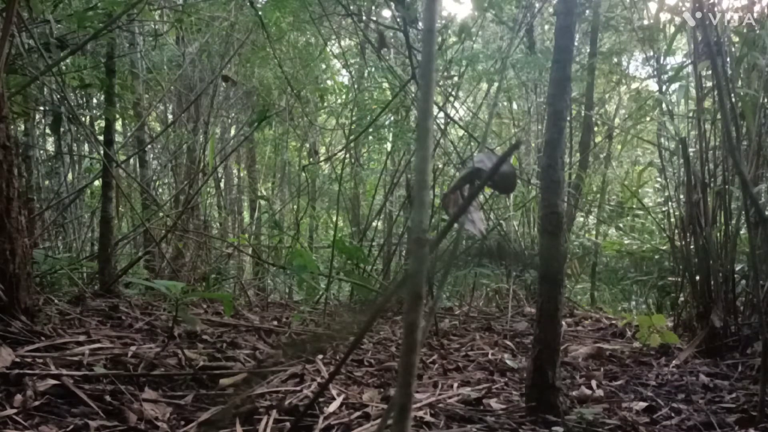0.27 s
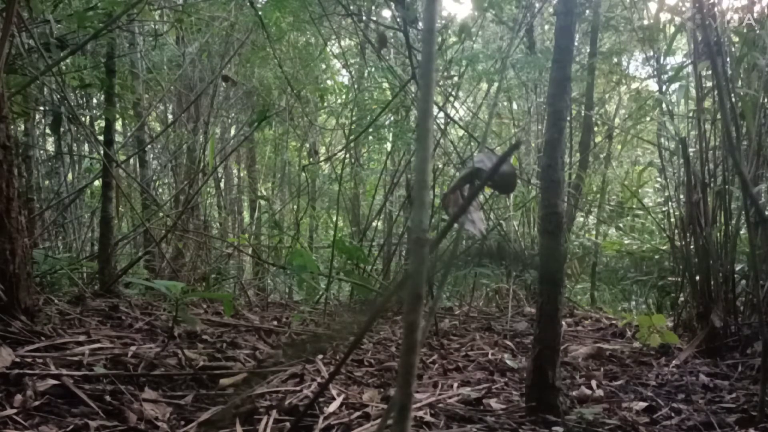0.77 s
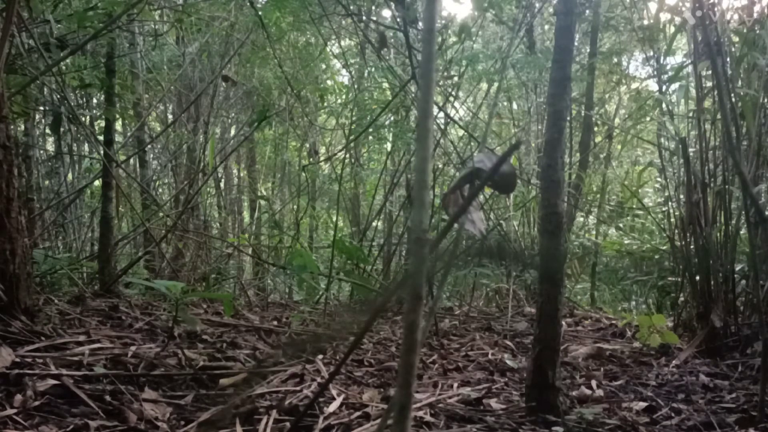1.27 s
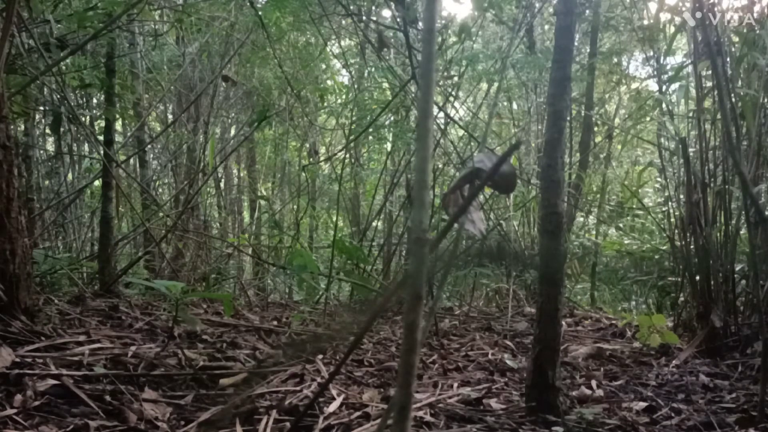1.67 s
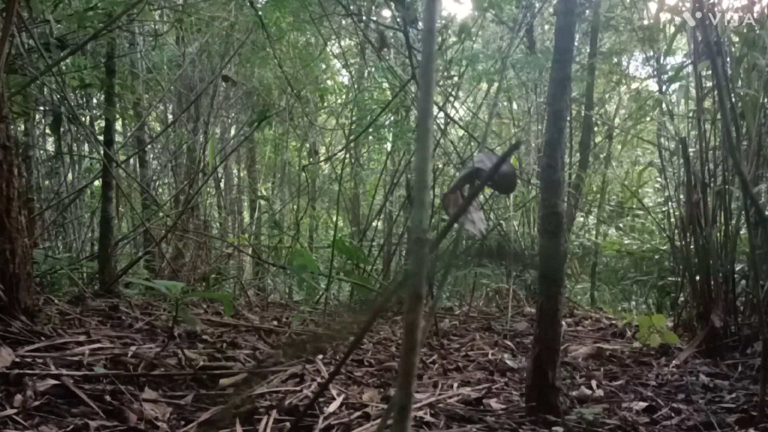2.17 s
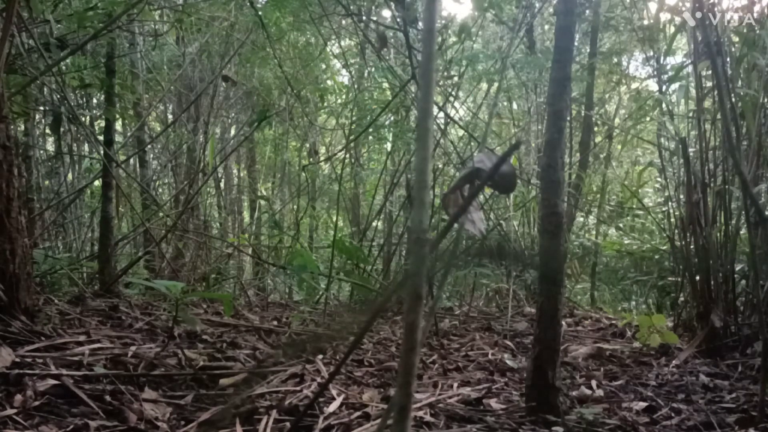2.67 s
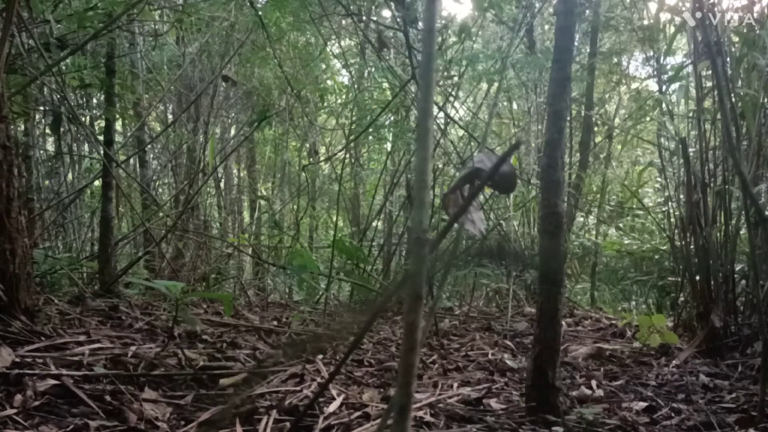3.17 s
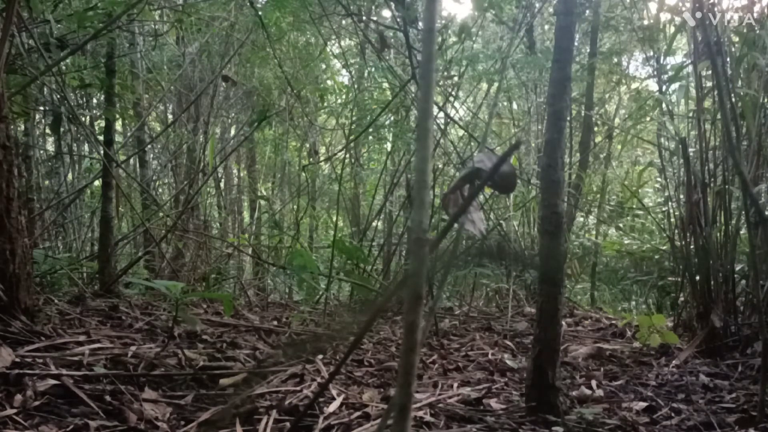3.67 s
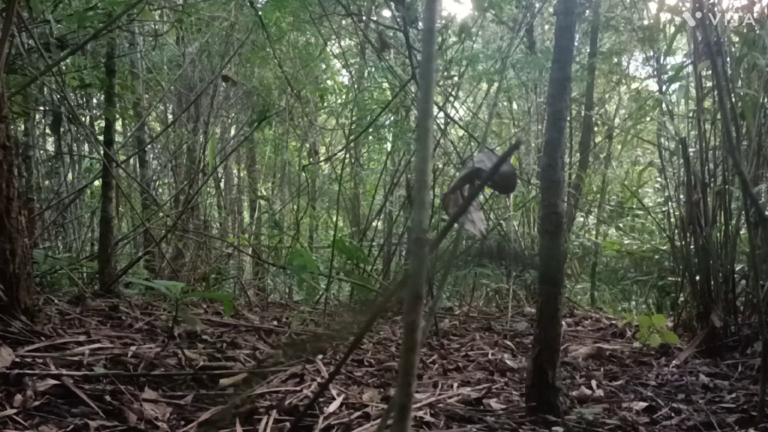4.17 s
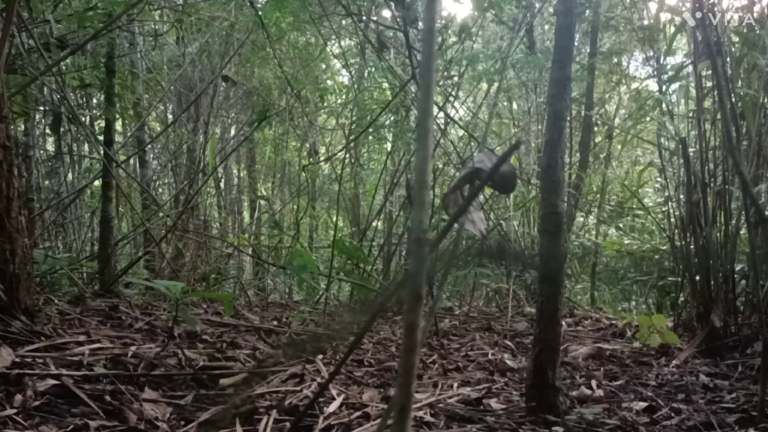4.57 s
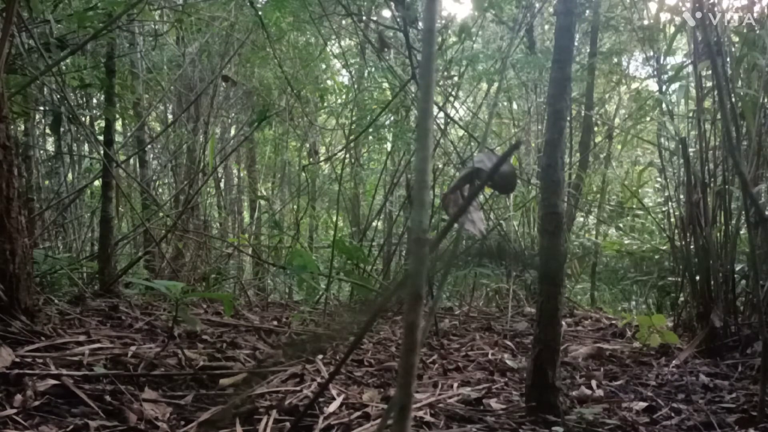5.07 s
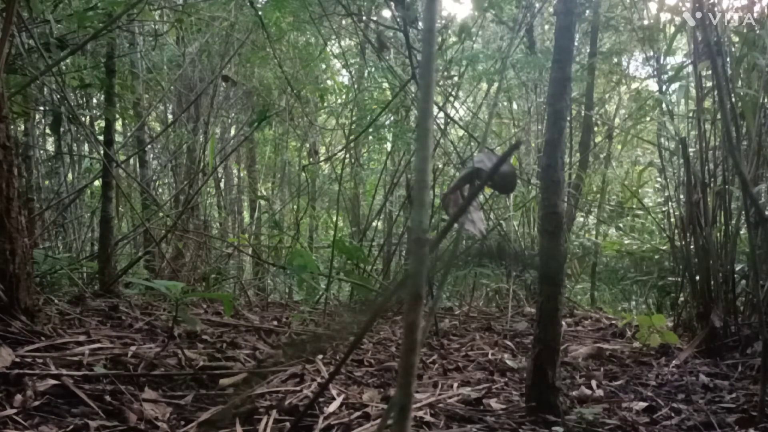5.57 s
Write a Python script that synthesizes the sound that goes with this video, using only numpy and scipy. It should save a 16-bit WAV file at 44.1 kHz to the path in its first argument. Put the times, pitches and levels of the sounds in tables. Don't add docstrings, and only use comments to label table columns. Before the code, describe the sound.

A jungle hen very near the microphone gives four loud, raspy clucks within the first second, the first already under way. Then only a rapidly throbbing cicada and a far insect chorus remain, over low forest noise. At about two seconds a twig snaps sharply, and dry leaves rustle softly in small swells. Outdoor woodland, small stereo camera whose background level dips under the calls and creeps back.

```python
import sys
import numpy as np
from scipy import signal
from scipy.fft import rfft, irfft, next_fast_len
from scipy.io import wavfile
from scipy.ndimage import uniform_filter1d, map_coordinates

SR = 44100
rng = np.random.default_rng(int(sys.argv[2]) if len(sys.argv) > 2 else 0)


def to_wav(sig):
    pcm = np.clip(np.atleast_2d(sig), -1, 1) * 32767
    pcm = np.round(pcm).astype(np.int16)
    wavfile.write(sys.argv[1], SR, pcm.T)


def volts_from_db(level):
    exponent = np.asarray(level, float) / 20
    return 10 ** exponent


N = 257103
TIME = np.arange(N) / SR

# start of the voice in seconds, time held in seconds, voice in dB, air puff in dB.
CALLS = [
    (-.06, 0.17676, -13.5, -62),
    (.233, 0.18695, -14, -60),
    (.508, 0.1558, -13, -66),
    (.76, 0.17066, -13.5, -70),
]
# centre in Hz, width in Hz, level in dB.
THROAT = [(601, 250, -10.5), (1221.4, 150, -7), (1371.8, 300.5, -5), (1809, 280, -1.5), (2151.8, 266.8, -2),
          (3048.5, 801.5, -26.5)]
# centre in Hz, width in Hz, depth from 0 to 1.
HOLLOWS = [(760, 110, .7), (1011, 99.94, .6), (2478.1, 120, .5)]
# frequency in Hz, level in dB per Hz.
BEAK_HISS = [(2300, -35), (2800, -8.5), (3400, -7.5), (3720, -19), (3950, -15), (5700, -2.5), (7200, -2.5),
             (7900, -13.5), (8700, -3), (9900, -13.5), (11300, -4.5), (12700, -16.5), (14400, -6),
             (15700, -15.5)]
# frequency in Hz, likeness (1 is the same).
HISS_ALIKE = [(300, 1), (2500, 0.602), (3800, 0.24), (7500, 0.984), (9000, 0.14), (12500, 0.43),
              (14000, 0.081)]
# frequency in Hz, level in dB per Hz.
PUFF = [(20, -5.5), (60, -1.5), (250, 1), (400, -33)]
# frequency in Hz, level in dB.
SCATTER = [(500, -36), (2000, -32), (5000, -23), (12000, -17)]
# frequency in Hz, time to fall 60 dB in seconds.
TREES = [(300, .3), (1000, 0.491), (2200, 0.479), (4000, 1), (8000, 0.31), (14000, 0.44)]
# frequency in Hz, level in dB, time to fall 60 dB in seconds.
DRUM_SKIN = [(4832, 14, 0.00999), (5350, 8.5, .01), (6551, -6.5, 0.0043), (10180, -3, 0.0068),
             (14244, 2.5, 0.00501), (15025, 5.5, .005)]
# time in seconds, throbs per second.
TEMPO = [(1.1, 11.455), (2.2, 11.883), (2.6, 11.192), (3, 11.262), (3.4, 11.675), (3.8, 11.794),
         (4.8, 11.616), (5.2, 11.644), (5.5, 11.372), (5.83, 11.92)]
# frequency in Hz, level in dB per Hz.
CHORUS = [(2500, -62.5), (3400, -33.5), (3850, -23), (4250, -24), (4650, -6), (5150, 4.5), (5600, -2.5),
          (5800, -23.5), (6600, -15), (7750, -39), (10100, -20.5), (12300, -40), (14400, -21.5),
          (15700, -25.5)]
# time in seconds, depth of the beat in dB.
UNISON = [(0, -7), (1.3, 2.5), (2, 0.5), (2.6, 1), (3.2, 0.5), (3.7, -0.14), (4.3, 0), (4.8, 2), (5.4, 2),
          (5.83, 1)]
# frequency in Hz, level in dB per Hz.
FOREST = [(10, -20), (25, -9), (90, -6), (184, -1.5), (320, -5), (476, -2), (581, -11), (1030, -9.5),
          (1580, -13), (2570, -10), (3280, -10.5), (4000, 0), (5200, -32), (8800, -120)]
# frequency in Hz, likeness (1 is the same).
AIR_ALIKE = [(100, 0.383), (900, 0.2512), (3000, 0.085), (7000, .05), (8000, 0.37), (9000, 0.0493),
             (12300, 0.898), (14000, 0.04996)]
# centre in Hz, width in Hz, level in dB, left over right in dB.
HUM = [(459.86, 49.37, -77.5, 0.5), (980.8, 45, -85.5, -1), (2010, 55, -77.5, -9.5),
       (3018.2, 80, -79.5, -14.5)]
# time in seconds, level in dB.
CRACKS = [
    (1.9677, -27),
    (1.9695, -28),
    (1.9706, -23),
    (1.9722, -17),
    (1.9732, -1),
    (1.9738, -13),
    (1.9746, -8),
    (1.9753, -11),
    (1.9762, -17),
    (1.9776, -23),
]
# frequency in Hz, level in dB per Hz.
WOOD = [(30, -22), (150, -19.5), (600, -17.5), (1500, -22), (2300, -6), (3000, -9), (5500, -2.5), (9000, 4),
        (12400, -10), (14600, -2), (15700, -21.5)]
# peak in seconds, level in dB, seconds to rise 20 dB, seconds to fall 20 dB.
RUSTLE = [(1.99, -57.5, 0.0728, 0.12), (2.15, -63, 0.32, 0.18), (2.3, -56.5, 0.2639, 0.4637),
          (3.96, -68, 0.14, 0.25), (4.09, -64.5, 0.34, 0.16), (4.4, -63, 0.11, 0.6859),
          (4.63, -69, 0.13, 0.02), (5.0, -70, 0.56, 0.37), (5.09, -63.5, 0.11, 0.19),
          (5.52, -65.5, 0.3, .05), (5.62, -66.5, 0.08, 0.17)]
# frequency in Hz, level in dB per Hz.
LEAVES = [(3000, -42), (6000, -3.5), (8500, 0.5), (12000, -3), (15500, -8.5)]
# frequency in Hz, left over right in dB.
PORTS = [(0, -0.5), (3000, 0.5), (5500, -14), (6100, -54), (6700, -46), (7100, -11), (8000, 2),
         (9100, 15.5), (9400, 44.5), (10200, 46), (10700, 13), (12300, -0.5), (13400, -3.5), (14200, -35.5)]

ATTACK_DB_PER_S, RELEASE_DB_PER_S = 3000, 1450
SWELL_DB_PER_S, SETTLE_DB, SETTLE_S = 12, 1.5, .012
PITCH_HZ, HISS_DB, BREATHY_EDGE = 1148.5, -12.5, 0.2
PUFF_FADE_DB_PER_S, PUFF_EDGE = 25, .5
CHEST_HZ, CHEST_DB, CHEST_FADE_DB_PER_S = 680, 3.5, 7
THROB_PHASE = .22
THROB_DB, THROB_SCATTER_DB, THROB_JITTER_S = -49, 0.82, .0015
THROB_DUCK = .5
DUCK_DB, LAST_CALL_S, RECOVER_S = -5.5, 1.01, 0.63
TOP_HZ = 15520


def unit(x):
    return x / np.sqrt(np.mean(x ** 2) + 1e-20)


def along(points, hz):
    f, v = np.transpose(points)
    return np.interp(np.log(hz + 1), np.log(f + 1), v)


def curve(rows):
    s, value = np.transpose(rows)
    return np.interp(TIME, s, value)


def wobble(rate):
    knots = rng.standard_normal(int(N * rate / SR) + 4)
    return unit(map_coordinates(knots, [TIME * rate]))


def filtered(x, response):
    m = next_fast_len(N + 8192)
    hz = np.fft.rfftfreq(m, 1 / SR)
    return irfft(rfft(x, m) * response(hz), m)[..., :N]


def coloured(x, spectrum):
    return filtered(x, lambda hz: volts_from_db(along(spectrum, hz)))


def resonance(f, centre, width):
    return 1j * f * width / (centre * centre - f * f + 1j * f * width)


def spread(pair, alike):
    def weights(hz):
        turn = np.arccos(np.clip(along(alike, hz), -1, 1)) / 2
        return np.array([np.cos(turn), np.sin(turn)])

    mid, side = filtered(pair, weights)
    return np.array([mid + side, mid - side])


def rush(spectrum, patchy_db):
    z = signal.stft(rng.standard_normal((2, N)), nperseg=512)[2]
    patches = uniform_filter1d(rng.standard_normal(z.shape[1:]), 6, 0)
    patches = uniform_filter1d(patches, 10, 1)
    pair = signal.istft(z * volts_from_db(patchy_db * unit(patches)), nperseg=512)[1][:, :N]
    return unit(coloured(spread(pair, AIR_ALIKE), spectrum))


def echo(x):
    t, z = signal.stft(rng.standard_normal((2, SR // 2)), SR, nperseg=256)[1:]
    hz = np.fft.rfftfreq(256, 1 / SR)
    fade_db = -60 * t / along(TREES, hz)[:, None]
    tail = signal.istft(z * volts_from_db(fade_db), SR, nperseg=256)[1]
    return signal.fftconvolve(x[None], tail / np.linalg.norm(tail[0]), axes=1)[:, :N]


def nearby(x, alike, lead_s, blur_s):
    paths = rng.standard_normal(600) * np.exp(-np.arange(600) / SR / blur_s)
    other = signal.fftconvolve(x, paths / np.linalg.norm(paths))[:N]
    pair = spread(np.array([x, other]), alike)
    return filtered(pair, lambda hz: np.exp(np.outer([1j, -1j], np.pi * hz * lead_s)))


def call_shape():
    start, hold, voice_db, puff_db = np.transpose(CALLS)[..., None]
    age = TIME - start
    edge_db = ATTACK_DB_PER_S * np.minimum(age, 0) - RELEASE_DB_PER_S * np.maximum(age - hold, 0)
    settle_db = SETTLE_DB * np.exp(-np.abs(age) / SETTLE_S)
    effort_db = SWELL_DB_PER_S * (np.clip(age, 0, hold) - hold / 2) - settle_db
    fade_db = PUFF_FADE_DB_PER_S * np.maximum(age, 0)
    puff_db = puff_db - fade_db + PUFF_EDGE * edge_db - 4 * settle_db
    now = np.argmax(edge_db, axis=0), np.arange(N)
    return (voice_db + effort_db + edge_db)[now], HISS_DB - BREATHY_EDGE * edge_db[now], puff_db[now]


def hen():
    voice_db, hiss_db, puff_db = call_shape()
    pitch = PITCH_HZ * np.exp(.13 * wobble(600) + .03 * wobble(90))
    cycles = np.cumsum(pitch) / SR
    burst = volts_from_db(2.6 * wobble(420))
    closure = np.exp(4 * np.cos(2 * np.pi * cycles))
    doubling = 1 + .25 * np.cos(np.pi * cycles + 1.9 * wobble(150))
    source = unit(np.gradient(closure) * doubling) + .6 * rng.standard_normal(N)

    def throat(f):
        ring = sum((-1) ** k * volts_from_db(db) * resonance(f, c, w) for k, (c, w, db) in enumerate(THROAT))
        return ring / (1 + (f / 2500) ** 8) ** 0.55 / (1 + (f / 3450) ** 18)

    def mouth(f):
        rise = (1j * f / 250) ** 2 / (1 + 1.1j * f / 250 - (f / 250) ** 2)
        return rise ** 2 * np.prod([1 - depth * resonance(f, c, w) for c, w, depth in HOLLOWS], axis=0)

    rasp = unit(filtered(source * burst, throat))
    rasp = nearby(rasp, [(2000, .97)], lead_s=.000085, blur_s=.002) * volts_from_db([[-1], [1]])
    swing = np.abs(uniform_filter1d(np.mean(rasp ** 2, axis=0), size=350))
    held = unit(rasp / (swing + .05) ** 0.253)
    voice = filtered(held * volts_from_db(voice_db), mouth)
    chest = filtered(voice, lambda f: 1 / (1 + (f / CHEST_HZ) ** 12))
    voice = voice + (volts_from_db(CHEST_DB - CHEST_FADE_DB_PER_S * TIME) - 1) * chest

    air = spread(rng.standard_normal((2, N)), HISS_ALIKE)
    hiss = unit(coloured(air, BEAK_HISS) * burst ** 0.522) * volts_from_db(voice_db + hiss_db + 2.5)
    push = spread(rng.standard_normal((2, N)), [(100, .75)])
    puff = volts_from_db(puff_db) * unit(coloured(push, PUFF))
    return voice + puff + hiss


def camera_gain():
    return DUCK_DB * np.exp(-(np.clip(TIME - LAST_CALL_S, 0, None) / RECOVER_S) ** 1.5)


def throb_count():
    return THROB_PHASE + np.cumsum(curve(TEMPO)) / SR


def throb_times():
    count = throb_count()
    s = np.interp(np.arange(1, int(count[-1]) + 1), count, TIME)
    draw = rng.standard_normal((len(s), 2))
    duck_db = THROB_DUCK * np.interp(s, TIME, camera_gain())
    return s + THROB_JITTER_S * draw[:, 0], THROB_DB + THROB_SCATTER_DB * draw[:, 1] + duck_db


def cicada():
    s, db = throb_times()
    place = np.linspace(-1, 1, num=12)
    draw = rng.standard_normal((len(s), 2 + 2 * len(DRUM_SKIN), len(place), 1))
    start = s[:, None] + .0165 * place + .0003 * draw[:, 0, :, 0]
    in_out_db = 1.497 * (-1) ** np.arange(len(place))
    size_db = db[:, None] + 6 - 7 * place ** 2 + 1.2 * draw[:, 1, :, 0] + in_out_db
    sag = (1 + 0.1 * ((place - .3) ** 2 - .45))[:, None]
    t = np.arange(300) / SR
    ring = 0
    for k, (hz, level, t60) in enumerate(DRUM_SKIN):
        fade = volts_from_db(level + 1.8 * draw[:, 2 * k + 2] - 60 * t / t60)
        pitch = hz * sag * (1 + 0.02 * draw[:, 2 * k + 3])
        ring = ring + fade * np.sin(2 * np.pi * pitch * t)
    clicks = volts_from_db(size_db)[..., None] * ring * (1 - np.exp(-t / 0.0004001)) ** 2
    where = (start * SR).astype(int)[..., None] + np.arange(300)
    song = np.bincount(where.ravel(), clicks.ravel(), N + SR)[:N]

    def body(f):
        small_drum = 1 / (1 + (4400 / (f + 1)) ** 24)
        return small_drum * (1 - .7 * np.exp(-((f - 5950) / 250) ** 2))

    song = filtered(song, body)
    return nearby(song, [(5000, 0.4412)], lead_s=0, blur_s=.003) + volts_from_db(-7.5) * echo(song)


def forest():
    beat = np.cos(2 * np.pi * (throb_count() - .07))
    chorus_db = -43 + curve(UNISON) * beat + .3 * wobble(5.6) + 1.199 * wobble(270)
    chorus = volts_from_db(chorus_db) * rush(CHORUS, patchy_db=0.5)
    low = volts_from_db(-62) * rush(FOREST, patchy_db=1.85)
    for hz, width, db, pan_db in HUM:
        band = unit(filtered(rng.standard_normal(N), lambda f: 1 / (1 + (2 * (f - hz) / width) ** 2)))
        swell_db = 1.196 * wobble(3.496) + 2.2 * wobble(11)
        low = low + volts_from_db(db + swell_db) * volts_from_db([[pan_db / 2], [-pan_db / 2]]) * band
    gain_db = camera_gain()
    return volts_from_db(gain_db) * chorus + volts_from_db(0.335 * gain_db) * low


def twig():
    snap, t = np.zeros(N), np.arange(200) / SR
    for s, db in CRACKS:
        burst = volts_from_db(-60 * t / 0.001187) * rng.standard_normal(len(t))
        snap[round(s * SR):][:len(t)] += volts_from_db(db) * burst / np.linalg.norm(burst)
    after = np.clip(TIME - CRACKS[-1][0], 0, None)
    patter_db = -41 - 60 * after / 0.0622 + 1.9 * wobble(300)
    snap += (after > 0) * volts_from_db(patter_db) * rng.standard_normal(N)
    u = np.clip(TIME - CRACKS[0][0], 0, None) / 0.0042
    jerk = volts_from_db(-42.5) * u * (2 - u) * np.exp(-u)
    return volts_from_db(15.5) * coloured(snap, WOOD) + jerk


def leaves():
    s, db, rise, fall = np.transpose(RUSTLE)[..., None]
    drop = np.where(TIME < s, (s - TIME) / rise, (TIME - s) / fall)
    swells = volts_from_db(db - 20 * drop).max(axis=0)
    return swells * volts_from_db(6.5 + 1.49 * wobble(58.02)) * rush(LEAVES, patchy_db=1.5)


def scene():
    call, snap = hen(), twig()
    near = call + nearby(snap, [(3000, 0.8)], lead_s=-.0002, blur_s=.0002)
    answer = echo(coloured(call[1], SCATTER) + volts_from_db(-27.5) * snap)
    return near + answer + cicada() + forest() + leaves()


def top_cut(x):
    return signal.sosfilt(signal.butter(12, 15800, fs=SR, output="sos"), x)


def record(dry):
    f, tilt_db = np.transpose(PORTS)

    def ports(hz):
        tilt = np.outer([-2, 2], np.interp(hz, f, tilt_db))
        return np.sqrt(2 / (1 + volts_from_db(tilt)))

    heard = filtered(dry, ports)
    rounded = heard / (1 + np.abs(heard / .95) ** 8) ** (1 / 8)
    return top_cut(filtered(rounded, lambda hz: hz < TOP_HZ))


dry = scene()
out = record(dry)
to_wav(out)
```